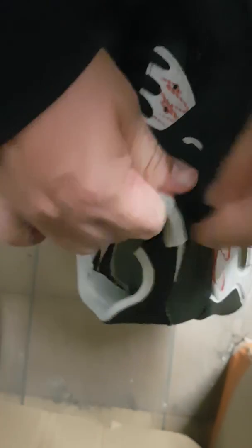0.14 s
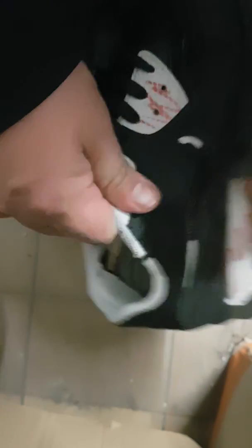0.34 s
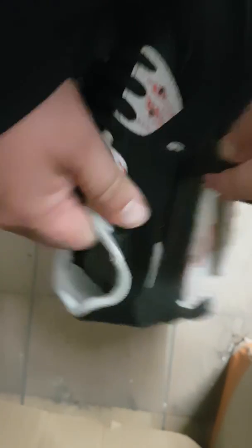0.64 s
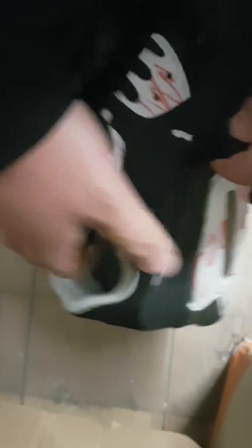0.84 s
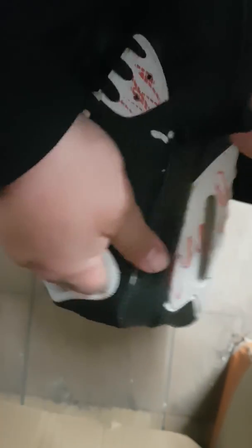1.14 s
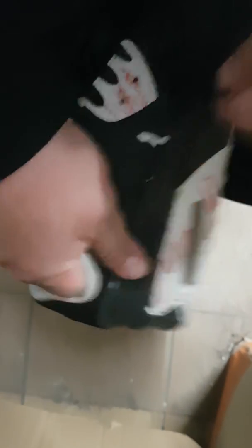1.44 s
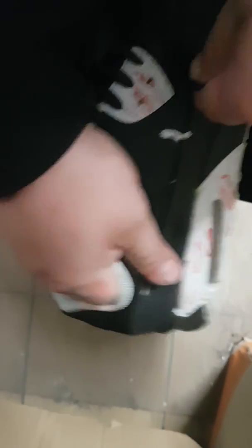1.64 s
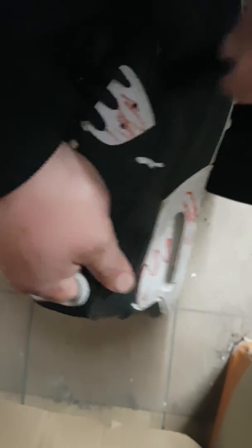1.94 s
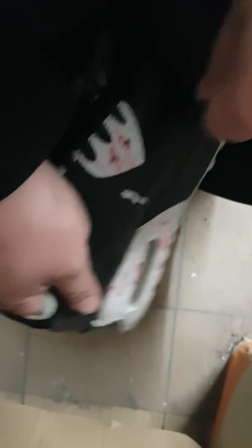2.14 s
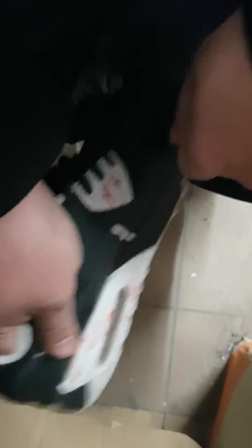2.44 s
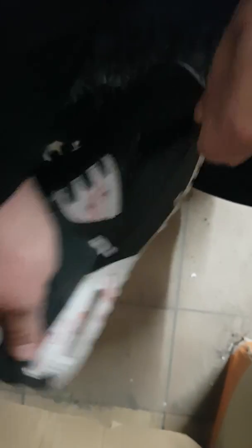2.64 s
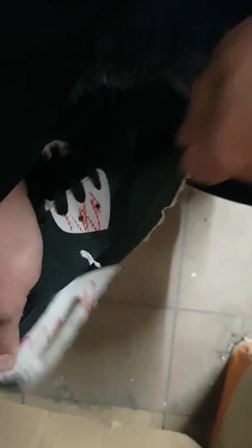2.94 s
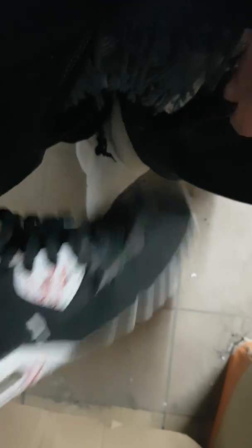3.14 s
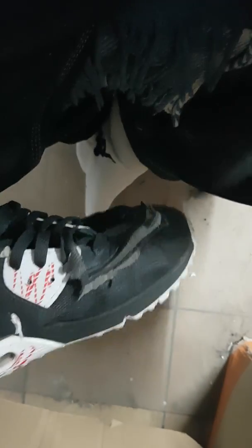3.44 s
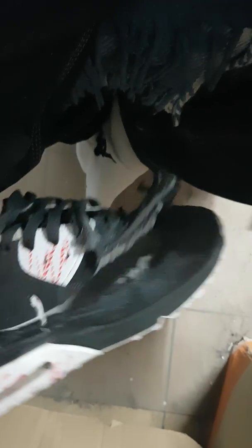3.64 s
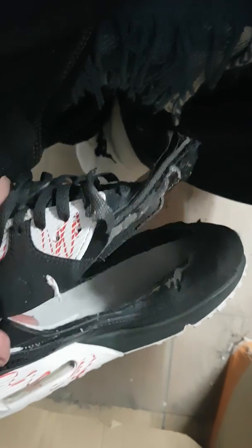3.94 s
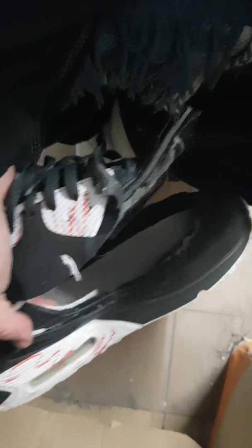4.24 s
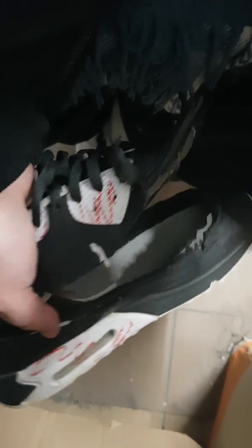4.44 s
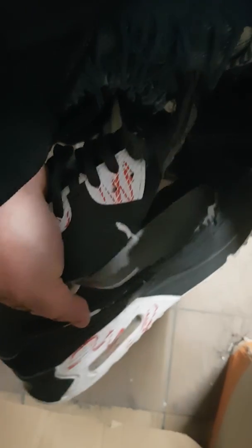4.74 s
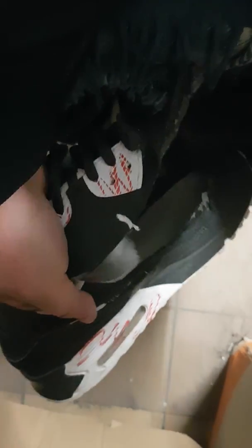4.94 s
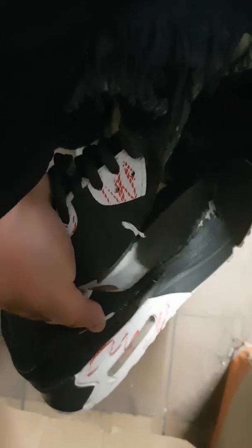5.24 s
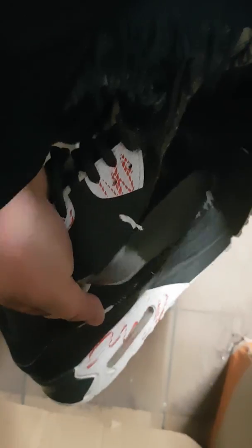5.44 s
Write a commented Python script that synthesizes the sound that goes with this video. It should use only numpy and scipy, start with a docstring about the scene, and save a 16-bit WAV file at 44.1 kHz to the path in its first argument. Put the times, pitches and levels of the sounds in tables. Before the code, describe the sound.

Hands tear a sneaker's cloth and seams apart, close to the microphone and on the left. Short, uneven rips rasp and crackle, with hollow thumps from the shoe and sharp cracks as single stitches break. After about three seconds and one strong rip, only a few small rips and cracks follow. The room is small and quiet, with a soft hiss and a distant machine's low hum.

```python
"""Short rips of cloth come first, close on the left: hands tear a sneaker's cloth and seams apart.
Threads snap in dense swarms that thump the hollow shoe and its sole, rasp and crackle; single stitches
break with sharp cracks. After about three seconds only a few small rips and cracks follow.
A phone's two microphones hear it in a small, quiet room, with a soft hiss and a far machine's hum."""
import sys
import numpy as np
from scipy import signal
from scipy.fft import rfft, irfft, next_fast_len
from scipy.io import wavfile
from scipy.ndimage import uniform_filter1d, map_coordinates

SR = 44100
rng = np.random.default_rng(int(sys.argv[2]) if len(sys.argv) > 2 else 0)


def pcm_store(signal):
    """Save signal as 16-bit PCM."""
    levels = np.round(np.clip(np.atleast_2d(signal), -1, 1) * 32767)
    wavfile.write(sys.argv[1], SR, levels.astype(np.int16).T)


N = 247004

# The notes of the hollow shoe and of its thick sole: (pitch [Hz], width [Hz], relative level [dB])
HOLLOW_NOTES = [(449, 56.6, -2), (547, 70, 1), (673.6, 127.5, 3), (920, 214, 1.5), (1100, 343, -2),
                (1342, 360, -9)]
SOLE_NOTES = [(146, 144, -5.5), (235.4, 115, 0), (305, 158, -2.5)]
def tearing():
    """One swarm of snaps thumps, booms, rasps and crackles, as hard as the hands pull."""
    power = handling() + pulls()
    swarm = snaps(per_second=2000, scatter_db=2.06, clump_db=1.58)
    thump = ring(swarm, HOLLOW_NOTES)
    boom = ring(swarm, SOLE_NOTES)
    fuzz = fray(swarm, fade_s=0.00196)
    rasp = band(fuzz, 1870, 4830)
    crackle = band(fuzz, 3800, 14500)
    layers = [thump, boom, rasp, crackle]
    return sum(gain * unit_level(layer) for gain, layer in zip(np.sqrt(power), layers))


# One row for each pull; scene() boosts all shoe sounds together. (time of full force [s], hold [s],
# rise [s], fall [s], thump [dB], boom compared with thump [dB], rasp [dB], crackle [dB])
HAND_PULLS = [(0.0, 0.0095, .02, 0.023, -43.5, -4, -53, -55.5),
              (0.204, 0.0069, 0.16, 0.013, -38, -1.5, -39.5, -43),
              (0.333, 0.078, 0.045, 0.019, -37.5, -4.5, -40.5, -43.5),
              (0.512, 0.01, 0.082, 0.066, -38, -13, -43, -45),
              (0.725, 0.0054, 0.047, 0.033, -51.5, 3, -52.5, -56),
              (0.951, 0.005, .25, .05, -50, -7, -59, -61.5),
              (1.066, 0.065, .07, 0.038, -44.5, -10, -51.5, -49.5),
              (1.205, 0.035, .03, 0.068, -44.5, -10, -52, -54),
              (1.272, 0.034, 0.1, 0.042, -36.5, -12, -49, -43),
              (1.438, 0.018, 0.037, .03, -33, -19, -47, -44.5),
              (1.462, 0.022, 0.018, 0.027, -26, -17, -38, -35.5),
              (1.52, 0.0042, 0.065, 0.013, -28.5, -22, -42.5, -38.5),
              (1.606, 0.0044, 0.052, 0.081, -35.5, -10, -50.5, -45.5),
              (1.76, .004, 0.0091, .08, -45, -6, -73, -58), (1.791, .005, 0.02, 0.038, -47, 0, -51.5, -49),
              (1.833, 0.0044, 0.046, 0.07, -37.5, -10, -54.5, -48.5),
              (1.885, 0.0045, 0.031, 0.03, -42, -7, -55.5, -49),
              (2.003, 0.0098, 0.041, .09, -38.5, -19, -55, -47.5),
              (2.145, 0.028, 0.011, .06, -44.5, -0.5, -51.5, -60),
              (2.204, 0.0044, 0.042, 0.075, -33, -12, -43, -38.5),
              (2.396, 0.027, 0.06, 0.068, -45, -3.5, -58, -50.5),
              (2.584, 0.068, 0.081, 0.056, -52.5, -19, -62.5, -59),
              (2.745, 0.0099, 0.014, .03, -50, 2, -52, -53),
              (2.772, 0.0051, 0.013, 0.068, -38.5, -5, -49, -49),
              (2.916, .003, 0.023, 0.038, -48.5, -0.5, -67, -61), (2.942, .01, .03, .05, -55, -7, -61, -56),
              (3.016, 0.0029, 0.047, 0.024, -30.5, 1, -39, -39),
              (3.03, 0.0038, 0.043, 0.069, -22.5, -3.5, -49, -37.5),
              (3.127, 0.0034, 0.058, 0.044, -45.5, -9, -57, -56),
              (5.014, 0.025, 0.11, 0.092, -68, 6.5, -65.5, -71),
              (5.275, .002, 0.013, 0.015, -57.5, -3, -63, -65)]
# How far thump, boom, rasp and crackle sink over one rise or fall time, a row each: (drop [dB])
SLACK_DROP_DB = [
    [26],
    [24.5],
    [25.5],
    [23.5],
]
def pulls():
    """Each pull tightens, holds and lets go. Gives the power of the four tearing layers over time."""
    t = np.arange(N) / SR
    power = np.zeros((4, N))
    for start, hold, rise, fall, thump_db, boom_db, rasp_db, crackle_db in HAND_PULLS:
        now = slice(max(int((start - 2 * rise) * SR), 0), int((start + hold + 2 * fall) * SR))
        before = (start - t[now]) / rise
        after = (t[now] - start - hold) / fall
        slack = np.maximum(np.maximum(before, after), 0)  # zero at full force
        full_db = np.c_[[thump_db, thump_db + boom_db, rasp_db, crackle_db]]
        power[:, now] += from_db(full_db - SLACK_DROP_DB * slack) ** 2
    return power


# The shoe shifting in the hands: (time [s], thump level [dB])
SHOE_SHIFTS = [(0, -81), (.3, -60), (.62, -61), (.78, -65), (1.0, -62), (1.18, -70), (1.38, -68),
               (1.72, -61.5), (1.96, -73), (2.12, -59.5), (2.33, -65.5), (2.52, -63), (2.72, -66.5),
               (2.9, -65), (3.2, -64), (3.6, -68), (3.77, -66), (3.9, -88), (4.7, -93), (5.6, -88)]
def handling():
    """The shoe rustles faintly between pulls. Gives the power of the same four layers."""
    thump_db = np.interp(np.arange(N) / SR, *np.transpose(SHOE_SHIFTS))
    over_thump_db = [[0], [2], [-5.5], [-7]]  # thump, boom, rasp, crackle
    return from_db(thump_db + over_thump_db) ** 2


def snaps(per_second, scatter_db, clump_db):
    """Threads part at random, a few much louder, and in clumps a few milliseconds long."""
    when, how_loud, which_way = rng.random((3, N))
    strength = from_db(-scatter_db * np.log(how_loud + 1e-9)) * np.sign(which_way - .5)
    return (when < per_second / SR) * strength * from_db(clump_db * wander(220))


# The tone of tearing cloth: (frequency [Hz], relative level [dB])
CLOTH_TONE = [(820, -33), (1400, 7.5), (1880, -4.5), (2040, -1), (2480, -1.5), (2770, -4.5), (3610, -2.5),
              (5160, -2), (8000, -4), (13900, -6), (16000, -10.5)]
def fray(swarm, fade_s):
    """Each snap leaves a short fuzz of noise, coloured by the cloth."""
    t = np.arange(int(SR * .02)) / SR
    power = signal.fftconvolve(swarm ** 2, np.exp(-t / fade_s))[:N]
    fuzz = np.sqrt(np.abs(power)) * rng.standard_normal(N)
    fuzz += .5 * rng.standard_normal(N)  # steady noise fills the gaps
    return irfft(rfft(fuzz) * from_db(read_curve(CLOTH_TONE, N)), N)


# Stitches that break alone; knock and tap levels cover the first 3 ms.
# (time [s], crack peak [dB], knock [dB], tap [dB], rasp peak [dB])
STITCH_BREAKS = [(0.1127, -34, -47, -58, -40), (0.202, -34, -36.5, -46, -36),
                 (0.2126, -30, -35.5, -58, -51), (0.412, -34, -38, -45, -32), (0.4758, -37, -46, -45, -35),
                 (0.5322, -30, -38, -40, -38), (0.5932, -43, -59, -56, -61), (0.6984, -50, -57, -49, -50),
                 (0.7257, -44, -38, -40, -39.5), (1.0594, -42, -44, -65, -54), (1.1968, -35, -40, -44, -55),
                 (1.2268, -32, -42, -54, -58), (1.261, -32, -33, -50, -55), (1.2849, -39, -42, -43, -42),
                 (1.3094, -37, -40, -44, -55), (1.4202, -41, -52, -52, -49), (1.4418, -37, -38.5, -35, -37),
                 (1.4683, -23, -27, -31, -40), (1.4849, -17, -28.5, -30, -37),
                 (1.5033, -27, -32.5, -44, -52), (1.5224, -30, -31, -38, -48), (1.5609, -48, -50, -53, -61),
                 (1.5983, -26, -39.5, -37, -53), (1.7619, -43, -36, -39.5, -44),
                 (1.7928, -29, -56, -38, -44), (1.8319, -29, -48, -43, -46), (1.8376, -28, -48, -36, -51),
                 (1.8787, -33.5, -53, -41, -47), (1.9784, -43, -46, -56, -60), (2.0363, -33, -42, -46, -54),
                 (2.1448, -50, -64, -32, -39), (2.1631, -26, -48, -32, -50), (2.1992, -24, -41, -39, -50),
                 (2.2103, -23, -32.5, -35.5, -48), (2.217, -18.5, -34, -32, -36),
                 (2.3388, -50, -62, -55, -57), (2.3907, -48, -40.5, -64, -53),
                 (2.5262, -40.5, -73, -55, -64), (2.585, -34.5, -62, -43.5, -60),
                 (2.7462, -25, -60, -38.5, -34.5), (2.7673, -26, -37, -35, -38),
                 (2.7844, -34, -49, -44, -57), (2.9187, -35.5, -57, -55, -53), (2.9424, -45, -54, -48, -46),
                 (2.9714, -34, -52, -40, -43), (3.0024, -36, -35, -33, -28), (3.0121, -20, -29, -25, -42),
                 (3.0274, -21, -17.5, -44, -38), (3.0414, -25, -33, -37, -48),
                 (3.0594, -28, -26.5, -30.5, -44), (3.1353, -32.5, -39.5, -36, -56),
                 (3.256, -52, -75, -67, -63), (4.3945, -37, -56, -50, -42.5), (5.2684, -50, -63, -59, -56)]
def stitches(length=2048):
    """Each break cracks, rasps, knocks the shoe's low notes and taps its high ones."""
    t = np.arange(length) / SR
    click = t == 0
    knock = ring(click, SOLE_NOTES + HOLLOW_NOTES[:3])
    tap = band(ring(click, HOLLOW_NOTES[3:]), 840, 2010)
    knock, tap = (part / np.std(part[t < .003]) for part in (knock, tap))
    out = np.zeros(N + length)
    for start, *levels_db in STITCH_BREAKS:
        noise = rng.standard_normal(length)
        crack = band(noise * np.exp(-t / 0.0016), 3350, 21400)
        rasp = band(noise * np.exp(-t / 0.0015), 1500, 5200)
        parts = [crack / np.abs(crack).max(), knock, tap, rasp / np.abs(rasp).max()]
        out[int(start * SR):][:length] += from_db(levels_db) @ parts
    return out[:N]


def room_echo(size, fade_60db_s=0.14, low_cut_hz=204, high_cut_hz=6700):
    """The walls answer with a short, dull echo. Gives one spectrum for each microphone."""
    t = np.arange(SR // 2) / SR
    fade_in = np.clip(t / 0.0044 - .5, 0, 1)
    tail = rng.standard_normal((2, len(t))) * from_db(-60 * t / fade_60db_s) * fade_in
    tail *= from_db(-13.5) / np.sqrt(np.sum(tail ** 2, axis=1, keepdims=True))
    hz = np.fft.rfftfreq(size, 1 / SR)
    walls = 1j * hz / (low_cut_hz + 1j * hz) / (1 + 1j * hz / high_cut_hz)
    return rfft(tail, size) * walls


# How the phone's body shades the far microphone: (frequency [Hz], level change [dB])
PHONE_SHADOW = [(60, 6), (300, -6.5), (1300, -7), (3000, -13.5), (6000, -24), (15000, -39)]
def microphones(sound, far_delay_s=0.00048):
    """The left microphone hears the shoe directly, the right one late and shaded; both hear the echo."""
    size = next_fast_len(N + SR)
    hz = np.fft.rfftfreq(size, 1 / SR)
    shaded = from_db(read_curve(PHONE_SHADOW, size)) * np.exp(-2j * np.pi * hz * far_delay_s)
    paths = np.array([np.ones(len(hz)), shaded]) + room_echo(size)
    near, far = irfft(rfft(sound, size) * paths, size)[:, :N]
    drifting = np.arange(N) + 5.2 * wander(9.7)  # the rip moves along the seam, so the delay drifts
    return np.array([near, map_coordinates(far, [drifting], order=3, mode="nearest")])


# The tone of the background hush: (frequency [Hz], relative level [dB])
HUSH_TONE = [(20, -42), (48, -8.5), (68, -21.5), (115, -16.5), (180, -12), (370, -19.5), (430, -15.5),
             (670, -22), (960, -24.5), (2000, -31), (4140, -39), (8000, -48.5), (13000, -42), (16400, -43)]
# Which side it leans to: (frequency [Hz], left minus right [dB])
HUSH_BALANCE = [(60, -10.5), (110, -14), (200, 0), (380, -7), (700, -4.5), (1290, -1.5), (2380, -0.5),
                (4400, 1), (8120, 5.5), (15000, 2.5)]
# How alike its two sides are: (frequency [Hz], likeness [-1 to 1])
HUSH_LIKENESS = [(60, 1), (300, 0.52), (700, 0.1), (1400, -0.61), (3000, 0.11)]
def hush():
    """The room's hush and the phone's own hiss, alike on both sides only in the bass."""
    alike = np.clip(read_curve(HUSH_LIKENESS, N), -.99, .99)
    shared, opposed = rfft(rng.standard_normal((2, N))) * from_db(read_curve(HUSH_TONE, N))
    both = shared * np.sqrt(1 + alike) + opposed * np.sqrt(1 - alike) * np.array([[1], [-1]])
    lean_db = read_curve(HUSH_BALANCE, N) / 2
    noise = irfft(both * from_db([lean_db, -lean_db]), N)
    noise /= np.std(band(noise.mean(axis=0), 183, 16000))
    return noise * from_db(-60.5 + wander(4.13))


# The machine's tones: (pitch [Hz], level [dB], left minus right [dB], left ahead by [radians])
HUM_TONES = [(36.4, -59, -4, 0.39), (90, -61, -6.5, 1.73), (146, -62, -8.5, 0.29)]
def machine_hum():
    """A far machine hums three low tones that waver a little in pitch and level."""
    out = 0
    for hz, db, lean_db, lead in HUM_TONES:
        phase = np.cumsum(2 * np.pi * (hz + 2.0 * wander(7)) / SR)
        tone = np.sqrt(2) * from_db(db + 0.88 * wander(5.1)) * np.sin([phase + lead, phase])
        out = out + tone * from_db([[lean_db / 2], [-lean_db / 2]])
    return out


def ring(hits, notes):
    """A struck body rings briefly at each of its own notes."""
    out = 0
    for k, (hz, width, db) in enumerate(notes):
        note = signal.lfilter(*signal.iirpeak(hz, hz / width, SR), hits)
        out = out + (-1) ** k * from_db(db) * note
    return out


def wander(per_second):
    """Glides between random values, mostly within -1 to 1."""
    step = int(SR / per_second)
    return uniform_filter1d(np.repeat(rng.standard_normal(N // step + 1), step), step)[:N]


def read_curve(table, size):
    """A table's value at every frequency of a sound that is size samples long."""
    hz, value = np.transpose(table)
    return np.interp(np.log(np.fft.rfftfreq(size, 1 / SR) + 1), np.log(hz), value)


def band(x, low_hz, high_hz):
    return signal.sosfilt(signal.butter(2, [low_hz, high_hz], "bandpass", fs=SR, output="sos"), x)


def from_db(db):
    return 10 ** (np.asarray(db) / 20)


def unit_level(x):
    return x / np.sqrt(np.mean(x ** 2))


def scene(close_boost_db=4.5):
    """The ripping shoe up close, over the hush and the hum."""
    shoe = band(tearing() + stitches(), 173, 22000)  # so small a body gives off no deep bass
    return microphones(from_db(close_boost_db) * shoe) + hush() + machine_hum()


def record(dry, top_hz=15900, offset=-.0006):
    """The phone cuts the highest treble, and its signal sits slightly off zero."""
    return offset + signal.sosfilt(signal.ellip(10, .2, 70, top_hz, fs=SR, output="sos"), dry)


dry = scene()
out = record(dry)
pcm_store(out)
```